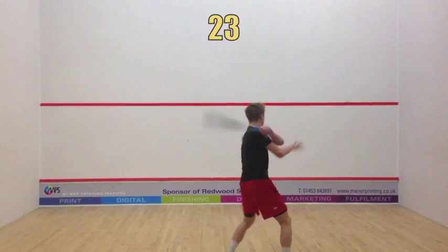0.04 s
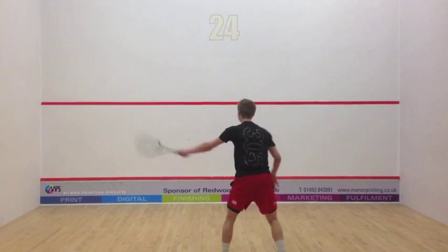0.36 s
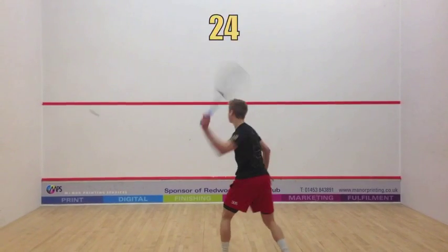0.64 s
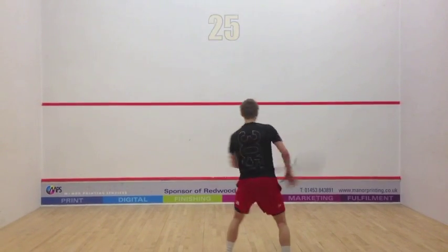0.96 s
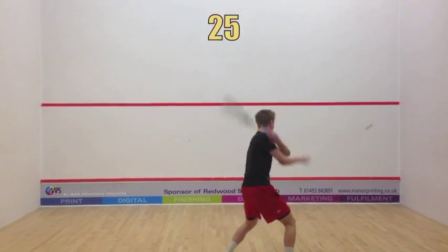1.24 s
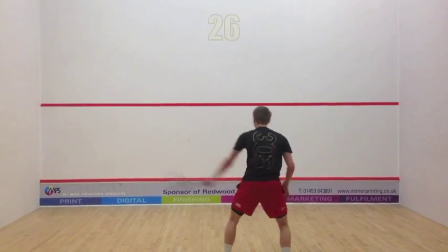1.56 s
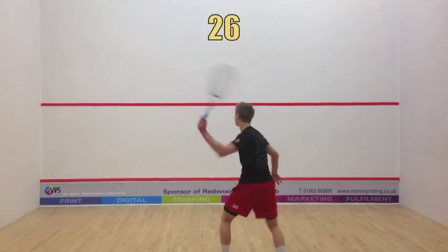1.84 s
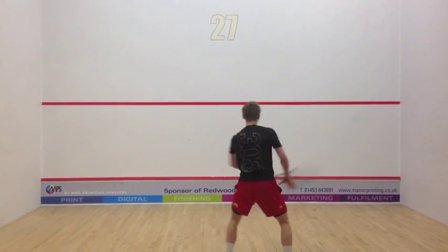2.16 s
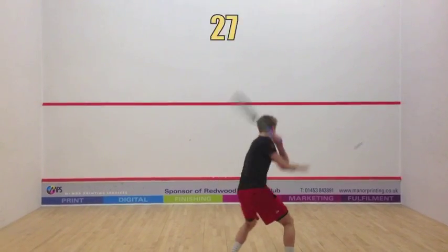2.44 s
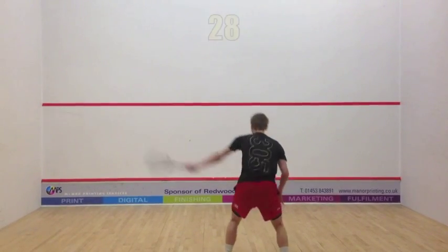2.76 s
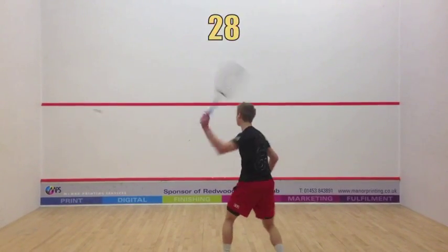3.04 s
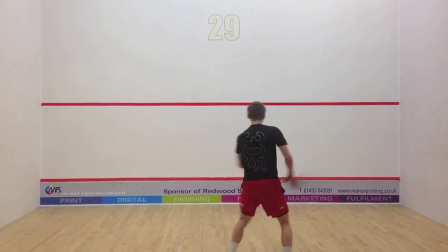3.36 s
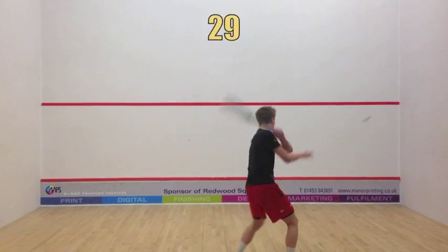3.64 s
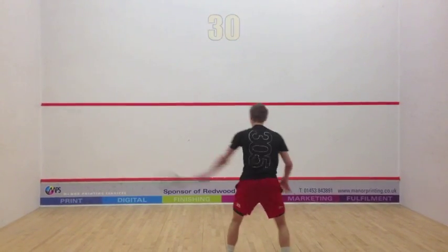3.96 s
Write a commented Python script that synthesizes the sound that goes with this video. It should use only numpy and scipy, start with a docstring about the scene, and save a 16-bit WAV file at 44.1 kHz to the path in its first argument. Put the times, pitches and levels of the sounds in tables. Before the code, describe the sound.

A squash ball is volleyed against a wall in an echoing indoor court. An earlier shot fades at the start. From about 0.3 seconds, racket hits come every 0.6 seconds, each a soft swish and a sharp pock, with a wall slap just over a tenth of a second later. Six pairs ring out over a faint hiss, then a last racket hit lands alone near 3.9 seconds.

```python
"""A squash ball is volleyed against the front wall of a closed court, over a faint hiss of air.
At first the previous shot is still dying away. Then air swishes through the swung racket, and the impact
sets strings and frame vibrating with a pock. About an eighth of a second later the ball slaps the wall.
Each impact flutters between front and back wall and melts into a long, bright reverberation.
The strokes recur about every 0.6 s, and the last is heard without its slap."""
import sys
import numpy as np
from scipy import signal
from scipy.fft import rfft, irfft
from scipy.io import wavfile

SR = 44100
rng = np.random.default_rng(int(sys.argv[2]) if len(sys.argv) > 2 else 0)


def store_pcm(level_fs):
    """Save levels as 16-bit WAV."""
    pcm = np.round(np.clip(level_fs, -1, 1) * 32767).astype(np.int16)
    wavfile.write(sys.argv[1], SR, np.atleast_2d(pcm).T)


N = 176400

# Racket strokes. Each row: start in seconds, pock in dB, reverberation in dB, string pitch in Hz,
# string ring in dB, frame pitch in Hz, frame ring in dB, ticks in dB, boom in Hz, boom in dB,
# boom peak in seconds, treble in dB, front-wall echo in dB, swish in dB. All levels are relative.
STROKES = [(-.34, 0, -1.5, 850, -2, 2570, 0, 0, 330, -2, .034, -1, -8, 9),
           (.2650, 0.5, 3, 884, -2.5, 2614, 1.5, -2, 320, -2, .036, -2.5, -9, 1.5),
           (0.8681, 1.5, -1.5, 742, -4.5, 2530, 0.5, -3.5, 390, 2, 0.054, 2, -9.5, 2.5),
           (1.4649, 1, 0, 852, 1.5, 2520, -20, -1, 308, 4, 0.027, 1, -7.5, 3.5),
           (2.0886, 1.5, 0.5, 698, -2, 2590, -2, -12, 371, 2, 0.039, -1, -13, 2.5),
           (2.6807, 0.5, 2.5, 886, 4.5, 2430, -5, 1.5, 303, 0, 0.013, -1.5, -6, 5),
           (3.2871, 0.5, 0, 701, -1, 2610, -0.5, 4.5, 350, -1.5, .046, 1.5, -9, 1),
           (3.878, 0, 2.5, 814, 2, 2483, -2, -2, 324, 3, .024, -3.5, -6, 1)]
# Wall impacts. Each row: start in seconds, crack in dB, reverberation in dB, ball ring in Hz, ring in dB,
# boom in Hz, boom in dB, boom peak in seconds, treble in dB, bloom in Hz, bloom in dB,
# side-wall echo delay in seconds, its level in dB, late echo delay in seconds, its level in dB.
SLAPS = [(-.23, -1, -4.5, 1760, -3, 350, 1.5, .028, -5.5, 880, -8, .012, -14, .12, -18),
         (0.3772, 1.5, -1, 2177, -9, 370, -4, 0.034, -2.5, 900, 10.5, 0.019, -14, 0.1, -25),
         (1.0032, -3, -0.5, 1730, -2, 354, 3.5, 0.027, -3.5, 1000, -6, 0.011, -6, .125, -10),
         (1.599, 0.5, -1, 1606, 1.5, 300, -3.5, 0.027, -3.5, 850, -12, 0.0058, -14, 0.12, -31),
         (2.2150, -1, 1, 2100, -27, 302, -0.5, 0.041, -2.5, 890, -4, 0.0084, -9, .13, -11),
         (2.8056, 1.5, 0, 1716, -1, 320, -8, 0.026, -3.5, 940, 4, .0095, -13, .114, -22),
         (3.421, -2.5, 0, 1854, -15, 345, 2.5, 0.026, -3, 850, -8, 0.011, -9, 0.2, -17)]

# Impulse trains. Each row: delay in seconds, level in dB.
SNAPS = [(0, -4.5), (.0016, -3), (.0020, -14), (.0033, -6.5)]  # the ball flattens and leaves the wall
TICKS = [(.0004, -5), (.002, -2), (.0038, -4)]  # the strings slip under the ball
SLAP_ECHOES = [(0.0131, -13.5), (0.016, -19), (0.0266, -16), (.07, -16), (.079, -16)]
STROKE_ECHOES = [(.0215, -12.5), (.0245, -9.5), (.029, -11), (.039, -24)]

# Racket modes. Each row: multiple of the string or frame pitch, level in dB, 60 dB decay time in seconds.
STRING_MODES = [(0.999, 1, 0.069), (1.24, -6.5, 0.06), (1.5, -19, 0.038), (1.88, -13.5, 0.037)]
FRAME_MODES = [(0.531, -6, 0.038), (0.998, -0.5, 0.04), (1.05, -6.5, 0.045), (1.392, -9, 0.056)]
# Bending of the shaft. One row: frequency in Hz, level in dB, 60 dB decay time in seconds.
SHAFT_MODE = (192, -12, 0.069)

# Spectra. Each row: frequency in Hz, relative spectral density in dB.
AIR_SPECTRUM = [(30, -12), (150, 4), (1000, -7), (5000, -2), (10000, -15), (15000, -14)]
SWISH_SPECTRUM = [(30, -28), (300, 8), (1500, -5), (3500, -2), (6500, -4), (8300, -5.5), (10000, -21),
                  (15000, -19)]
TICK_SPECTRUM = [(30, -50), (800, -35), (2500, 0), (4500, -6), (7300, -2), (10000, -14), (15000, -27)]
CRACK_SPECTRUM = [(30, -35), (100, -36), (200, 5), (550, -26), (800, 6), (1400, -2), (3000, -6),
                  (4800, -12), (7500, -6), (10000, -32), (15000, -29)]
SNAP_SPECTRUM = [(30, -40), (120, -38), (300, -3), (850, -1.5), (2200, 4.5), (3200, -0.5), (4500, -5.5),
                 (7000, 1), (10000, -14), (15000, -18)]
SMACK_SPECTRUM = [(30, -33), (100, -31), (250, -16), (550, -2), (850, 8), (1200, -2), (1600, 4.5),
                  (2200, 4.5), (4000, -9), (7500, -20), (10000, -27), (15000, -33)]
STROKE_REVERB_SPECTRUM = [(30, -37), (80, -35), (125, -17.5), (180, -13), (260, -3), (420, -2), (570, -7.5),
                          (720, 0), (880, 1), (1100, -2), (1700, -8.5), (2500, -9), (3300, -13),
                          (4700, -14), (7300, -15), (10000, -26.5), (15000, -35)]
SLAP_REVERB_SPECTRUM = [(30, -56), (80, -36.5), (125, -14.5), (165, -12), (200, -4.5), (320, -2.5),
                        (450, -4), (570, -9.5), (720, -1), (880, -0.5), (1100, -5.5), (1700, -4),
                        (2400, -5), (3300, -13), (4500, -16), (6800, -11.5), (8300, -13.5), (10000, -21),
                        (15000, -24)]

# Decay of the court. Each row: frequency in Hz, reverberation time in seconds.
COURT_T60 = [(100, 1.2), (300, 1.325), (850, 1.615), (2000, 1.72), (4000, 1.41), (7000, 0.92),
             (10000, 0.56), (15000, 0.39)]
# Lingering resonances of the court. Each row: centre in Hz, width in Hz, level in dB.
COURT_RESONANCES = [(425, 64, -20), (869, 75, -11), (1613, 88, -19)]

SIZE = 65536  # samples in one event
AGE = np.arange(SIZE) / SR
FREQ = np.maximum(np.arange(SIZE // 2 + 1) * SR / SIZE, 1)

AIR_DB, STROKE_REVERB_DB, SLAP_REVERB_DB = -65.5, -28, -24
BOOM_WIDTH_HZ, STROKE_BOOM_DB, SLAP_BOOM_DB = 126, -2, -0.5
BLOOM_WIDTH_HZ, SLAP_BLOOM_DB, SLAP_BLOOM_S = 230, -3, 0.016
STRING_BLOOM_DB, STRING_BLOOM_S = -6.5, 0.047  # the court takes up the note of the strings
FRONT_ECHO_S, ROUND_TRIP_S, FLUTTER_DB, FLUTTER_LOSS_DB = 0.08, 0.0568, -11, -3
DULLING_HZ, DULLING_S = 11900, 0.068  # an echo loses one neper at this frequency in this travel time
SCATTER, SCATTER_S = 0.72, 0.0042  # ratio of scattered to specular amplitude per trip; smear decay
SWISH_DB, SWISH_RISE_S, SWISH_FALL_S = -44.5, 0.026, 0.14
CRACK_PEAK_S, TICK_DB, TICK_S = 0.0033, -7.5, 0.00016
RACKET_RING_DB, RACKET_RISE_S, MODE_SPREAD = -20.5, 0.0029, 0.006
SNAP_DB, SMACK_DB, SMACK_S = 8.5, 7.5, 0.0044
BALL_RING_DB, BALL_PEAK_S, BALL_RING_S = -15, 0.003, 0.0046


def amp(db):
    """Decibels as an amplitude ratio."""
    return 10 ** (np.asarray(db) / 20)


def unit(x):
    """Normalisation to unit energy."""
    return x / np.sqrt(np.sum(x ** 2))


def level_at(spectrum, hz):
    """Interpolation on a log-frequency axis."""
    freqs, levels = np.array(spectrum).T
    return np.interp(np.log(hz), np.log(freqs), levels)


def colour(x, spectrum, treble_db=0):
    """Minimum-phase filtering by a spectrum and a treble shelf."""
    shelf = FREQ ** 2 / (FREQ ** 2 + 3500 ** 2)
    cepstrum = irfft(np.log(amp(level_at(spectrum, FREQ) + treble_db * shelf)))
    cepstrum[1:SIZE // 2] *= 2
    cepstrum[SIZE // 2 + 1:] = 0
    return irfft(rfft(x) * np.exp(rfft(cepstrum)))


def impulses(rows, jitter):
    """An impulse train, each delay varied by a random fraction."""
    out = np.zeros(SIZE)
    for delay_s, db in rows:
        delay_s *= 1 + jitter * rng.standard_normal()
        out[int(abs(delay_s) * SR)] += amp(db)
    return out


def decay(t60):
    """Exponential damping by 60 dB in t60 seconds."""
    return np.exp(-np.log(1000) * AGE / t60)


def add(out, start_s, x):
    """Superposition of a sound that may begin before time zero."""
    i = int(round(start_s * SR))
    x, i = x[max(-i, 0):], max(i, 0)
    out[i:i + len(x)] += x[:max(N - i, 0)]


def air():
    """Stationary noise: the faint hiss of the court's still air."""
    hz = np.maximum(np.arange(N // 2 + 1) * SR / N, 1)
    hiss = irfft(rfft(rng.standard_normal(N)) * amp(level_at(AIR_SPECTRUM, hz)), N)
    return amp(AIR_DB) * np.sqrt(N) * unit(hiss)


def room_modes(hz, width_hz):
    """Modal overlap: dense room resonances merge into a narrow band of noise."""
    return irfft(rfft(rng.standard_normal(SIZE)) / (1 + ((FREQ - hz) / width_hz) ** 2) ** 3)


def swell(hz, width_hz, peak_s):
    """Transient response: a group of room modes swells and fades as one after a hit."""
    notes = signal.hilbert(room_modes(hz, width_hz))
    strength = np.abs(notes)
    evened = notes.real / (strength + strength.mean() / 2)
    return unit(evened * (AGE * np.exp(-AGE / peak_s)) ** 2.8)


def reverberation(spectrum, treble_db, build_s, early_db, early_s):
    """Diffuse field: countless reflections build up, then decay, the high treble soonest."""
    grain = np.exp(0.24 * np.repeat(rng.standard_normal(SIZE // 32), 32))  # uneven reflection strengths
    field = rfft(unit(colour(rng.standard_normal(SIZE) * grain, spectrum, treble_db)))
    for hz, width_hz, db in COURT_RESONANCES:
        field += amp(db) * rfft(unit(room_modes(hz, width_hz)))
    centres = np.log([hz for hz, _ in COURT_T60])
    tail = sum(irfft(field * np.interp(np.log(FREQ), centres, band)) * decay(t60)
               for band, (_, t60) in zip(np.eye(len(centres)), COURT_T60))
    build_up = 1 - np.exp(-(AGE / build_s) ** 2)
    early_lift = 1 + amp(early_db) * np.exp(-AGE / early_s)
    return tail * np.sqrt(SIZE) * build_up * early_lift


def reflection(delay_s, db):
    """Absorption: the longer an echo's path, the more treble the air and walls take."""
    absorption = abs(delay_s) / DULLING_S * (FREQ / DULLING_HZ) ** 2
    return amp(db) * np.exp(-2j * np.pi * FREQ * delay_s - absorption)


def echoes(x, rows):
    """Multipath propagation: direct sound, first reflections and a flutter that dulls and smears."""
    paths = 1 + sum(reflection(s + 0.0004 * rng.standard_normal(), db) for s, db in rows)
    round_trip = np.exp(-2j * np.pi * FREQ * ROUND_TRIP_S - (FREQ / DULLING_HZ) ** 2 / 2)
    echo, specular = amp(FLUTTER_DB), 1
    for _ in range(5):
        smear = rfft(unit(rng.standard_normal(SIZE) * np.exp(-AGE / SCATTER_S)))
        echo = echo * round_trip
        specular /= np.hypot(1, SCATTER)
        paths += echo * (specular + np.sqrt(1 - specular ** 2) * smear)
        echo *= amp(FLUTTER_LOSS_DB)
    return irfft(rfft(x) * paths)


def swish(lead_s):
    """Flow noise: air hisses through the strings, growing until contact and fading after it."""
    t = AGE - lead_s
    envelope = np.exp(np.minimum(t / SWISH_RISE_S, -t / SWISH_FALL_S))
    return envelope * np.sqrt(SIZE) * unit(colour(rng.standard_normal(SIZE), SWISH_SPECTRUM))


def racket_ring(string_hz, string_db, frame_hz, frame_db):
    """Free vibration: strings, frame and shaft ring as a sum of damped modes."""
    modes = [(ratio * string_hz, db + string_db, t60) for ratio, db, t60 in STRING_MODES]
    modes += [(ratio * frame_hz, db + frame_db, t60) for ratio, db, t60 in FRAME_MODES]
    ring = np.zeros(SIZE)
    for hz, db, t60 in modes + [SHAFT_MODE]:
        hz *= 1 + MODE_SPREAD * rng.standard_normal()
        ring += amp(db) * np.sin(2 * np.pi * hz * AGE) * decay(t60)
    return amp(RACKET_RING_DB) * ring * (1 - np.exp(-AGE / RACKET_RISE_S))


def racket_stroke(pock_db, reverb_db, string_hz, string_db, frame_hz, frame_db, tick_db,
                  boom_hz, boom_db, boom_s, treble_db, echo_db):
    """Impact excitation: the ball sinks into the strings, which slip and tick; racket and court ring."""
    contact = AGE / CRACK_PEAK_S * np.exp(-AGE / CRACK_PEAK_S)
    crack = unit(colour(rng.standard_normal(SIZE) * contact, CRACK_SPECTRUM, treble_db))
    slips = impulses(TICKS, jitter=0.12)
    scrape = rng.standard_normal(SIZE) * np.exp(-AGE / TICK_S)
    ticks = unit(colour(irfft(rfft(slips) * rfft(scrape)), TICK_SPECTRUM))
    pock = crack + amp(TICK_DB + tick_db) * ticks + racket_ring(string_hz, string_db, frame_hz, frame_db)
    tail = reverberation(STROKE_REVERB_SPECTRUM, treble_db, build_s=0.009, early_db=-25, early_s=0.013)
    boom = amp(STROKE_BOOM_DB + boom_db) * swell(boom_hz, BOOM_WIDTH_HZ, boom_s)
    bloom = swell(string_hz, BLOOM_WIDTH_HZ, STRING_BLOOM_S)
    bloom *= amp(STRING_BLOOM_DB + reverb_db + string_db)
    pock = amp(pock_db) * echoes(pock, STROKE_ECHOES + [(FRONT_ECHO_S, echo_db)])
    return pock + amp(STROKE_REVERB_DB + reverb_db) * tail + boom + bloom


def wall_slap(crack_db, reverb_db, ring_hz, ring_db, boom_hz, boom_db, boom_s, treble_db,
              bloom_hz, bloom_db, side_s, side_db, late_s, late_db):
    """Elastic collision: the ball snaps flat, squeezed air smacks and the hollow rubber rings.
    Where it lands decides which echoes stand out and which room modes swell."""
    snaps = unit(colour(impulses(SNAPS, jitter=0.065), SNAP_SPECTRUM, treble_db))
    squeezed_air = rng.standard_normal(SIZE) * AGE * np.exp(-(AGE / SMACK_S) ** 2)
    smack = unit(colour(squeezed_air, SMACK_SPECTRUM, treble_db))
    crack = amp(SNAP_DB) * snaps + amp(SMACK_DB) * smack
    ring = np.sin(2 * np.pi * ring_hz * AGE) * np.exp(-((AGE - BALL_PEAK_S) / BALL_RING_S) ** 2)
    direct = amp(crack_db) * crack + amp(BALL_RING_DB + ring_db) * ring
    slap = echoes(direct, SLAP_ECHOES + [(side_s, side_db), (late_s, late_db)])
    tail = reverberation(SLAP_REVERB_SPECTRUM, treble_db, build_s=0.0044, early_db=-10, early_s=0.0051)
    boom = amp(SLAP_BOOM_DB + boom_db) * swell(boom_hz, BOOM_WIDTH_HZ, boom_s)
    bloom = amp(SLAP_BLOOM_DB + bloom_db) * swell(bloom_hz, BLOOM_WIDTH_HZ, SLAP_BLOOM_S)
    return slap + amp(SLAP_REVERB_DB + reverb_db) * tail + boom + bloom


def scene():
    """Superposition: air, swings, strokes and slaps add up to the rally."""
    out = air()
    lead_s = 0.15
    for start_s, *tone, swish_db in STROKES:
        add(out, start_s - lead_s, amp(SWISH_DB + swish_db) * swish(lead_s))
        add(out, start_s, racket_stroke(*tone))
    for start_s, *tone in SLAPS:
        add(out, start_s, wall_slap(*tone))
    return out[None]


def record(dry):
    """Saturation and band limiting: tall peaks are rounded, the deep bass thinned and the top cut."""
    ceiling, low_cut_hz, high_cut_hz = 0.78, 70, 15350
    rounded = ceiling * np.tanh(dry / ceiling)
    thinned = signal.sosfilt(signal.butter(1, low_cut_hz, "high", fs=SR, output="sos"), rounded)
    return signal.sosfilt(signal.ellip(8, 0.2, 70, high_cut_hz, fs=SR, output="sos"), thinned)


dry = scene()
out = record(dry)
store_pcm(out)
```